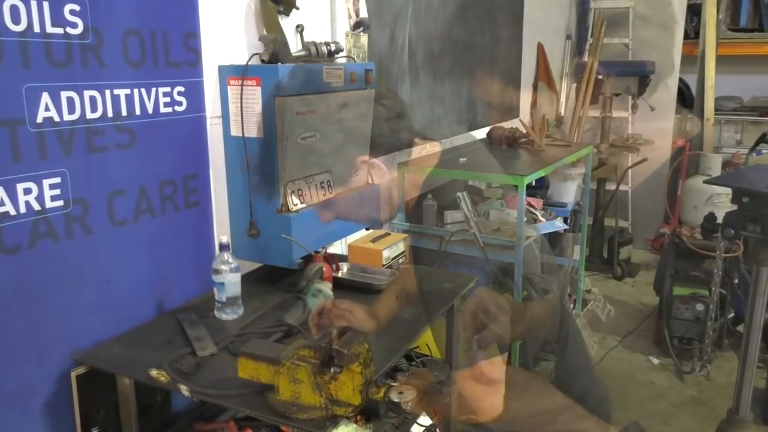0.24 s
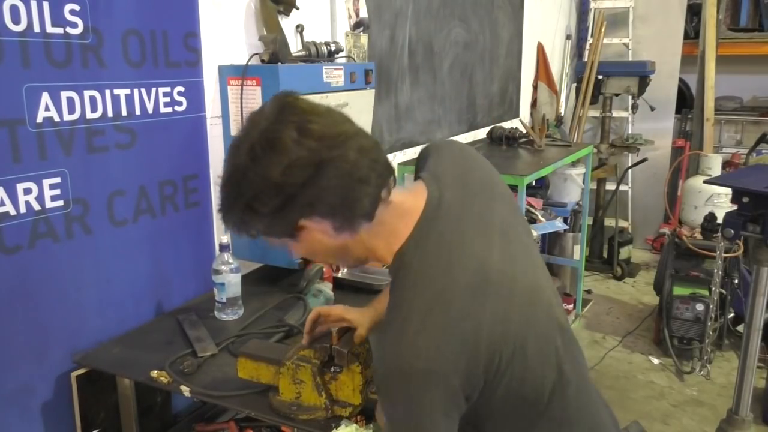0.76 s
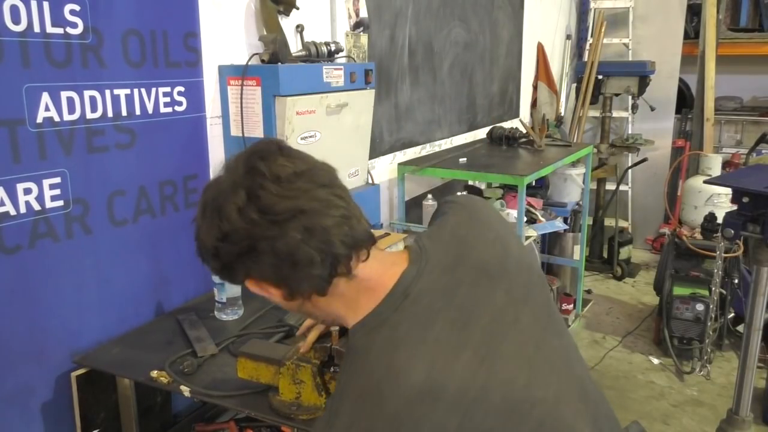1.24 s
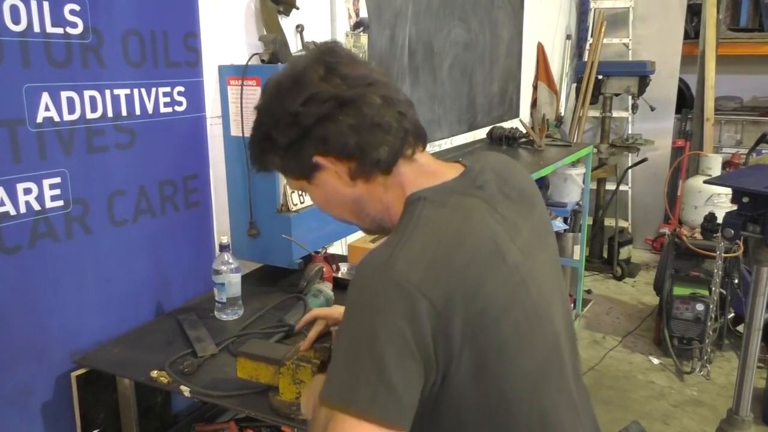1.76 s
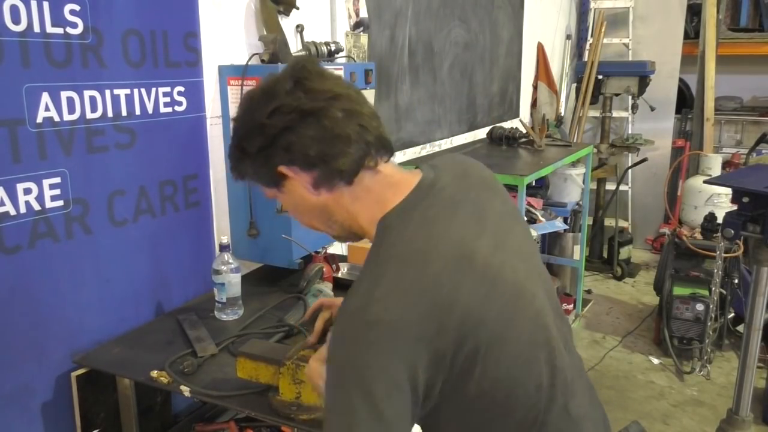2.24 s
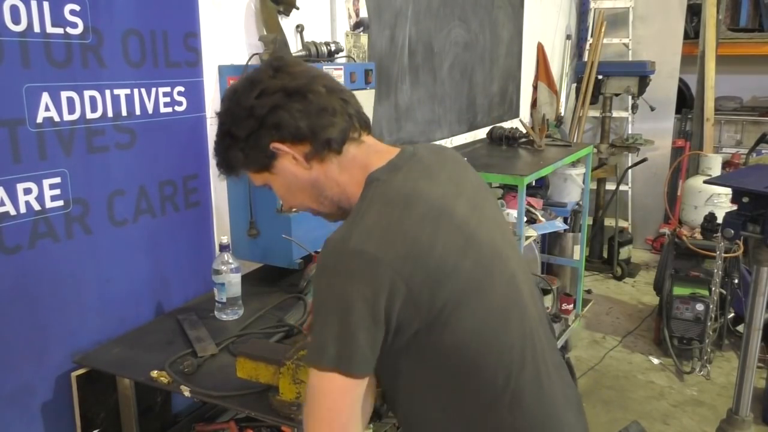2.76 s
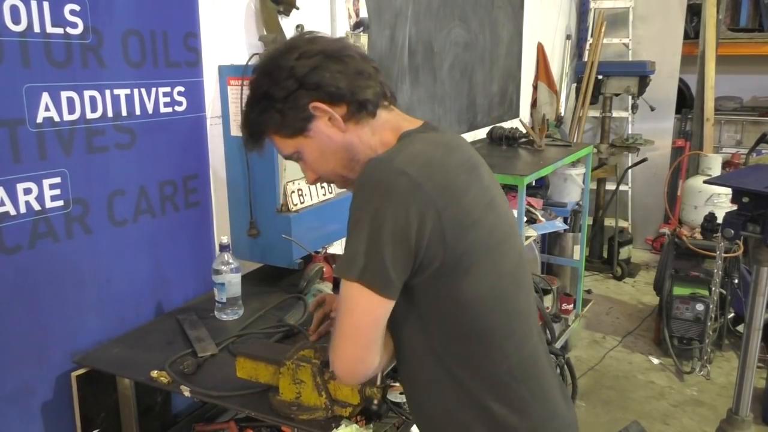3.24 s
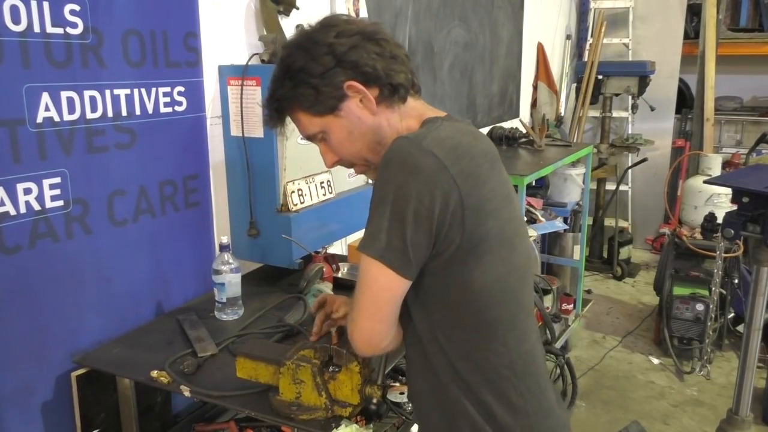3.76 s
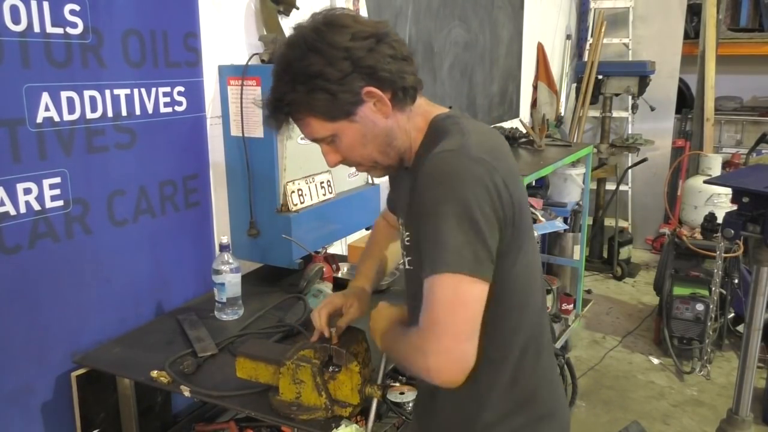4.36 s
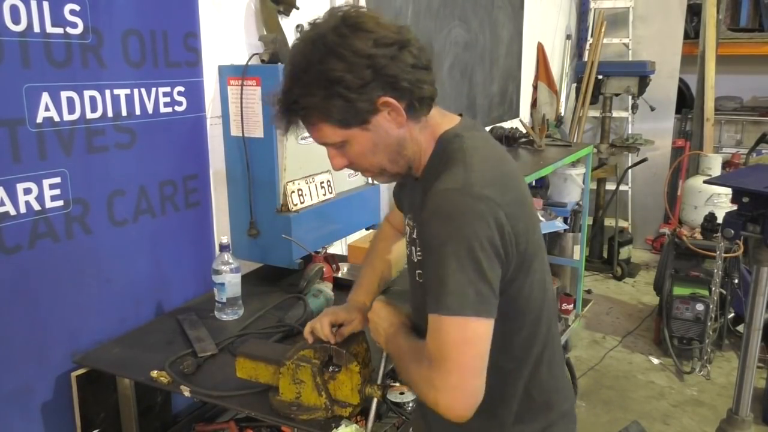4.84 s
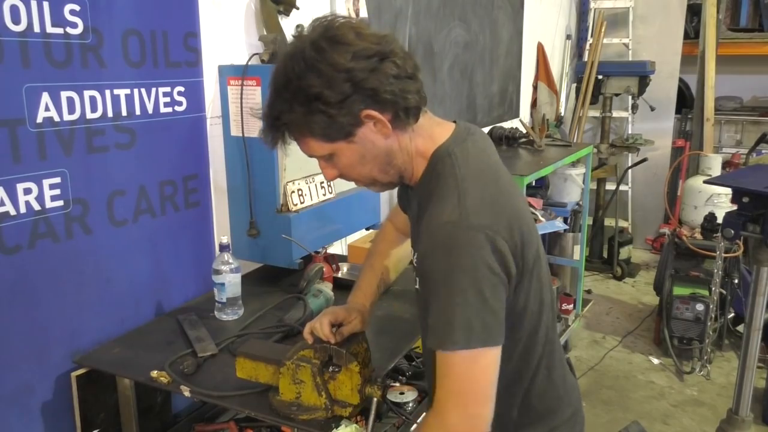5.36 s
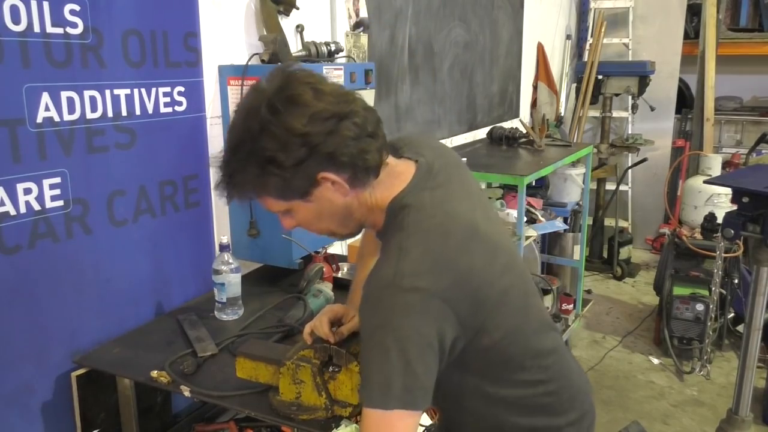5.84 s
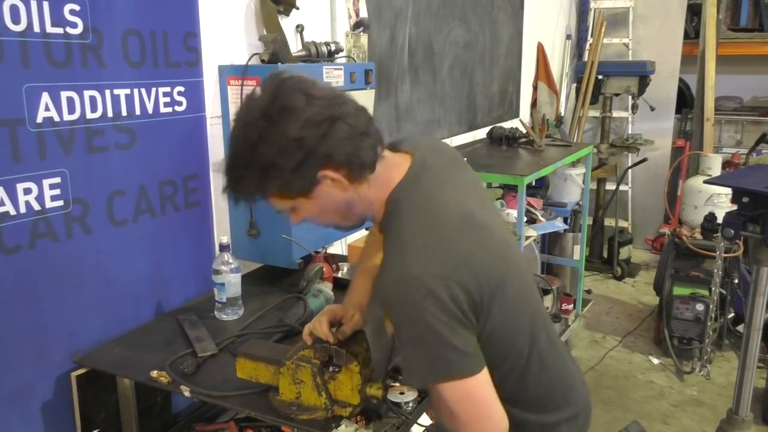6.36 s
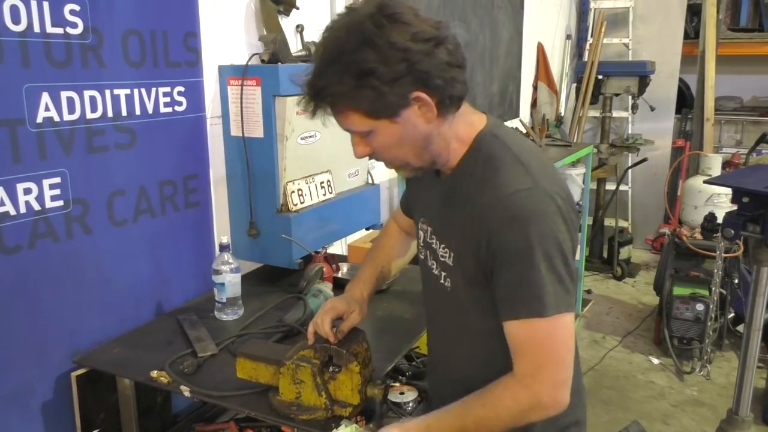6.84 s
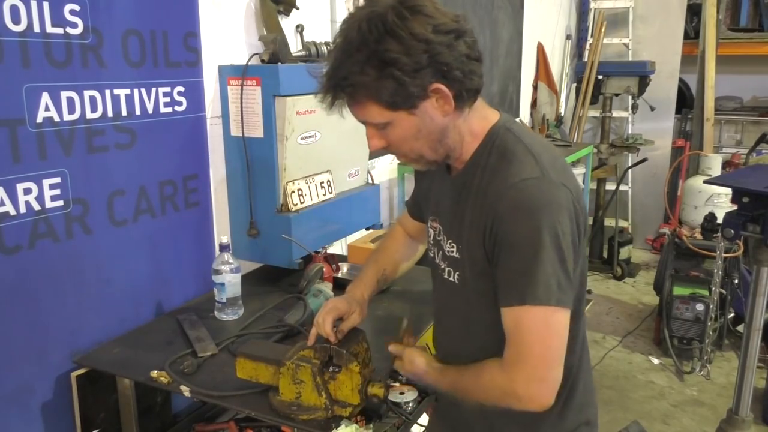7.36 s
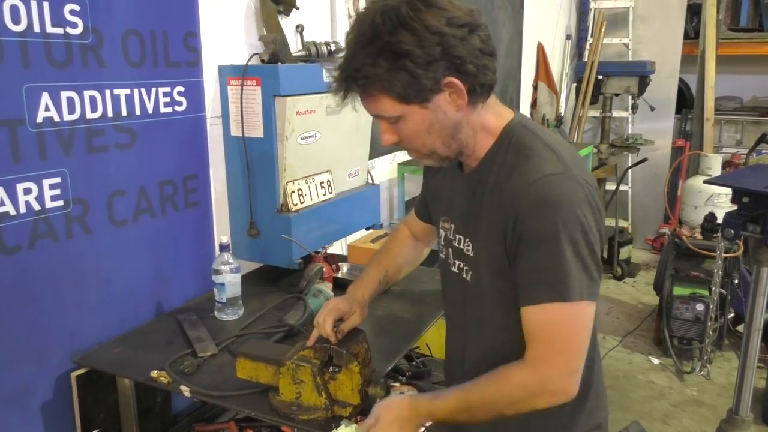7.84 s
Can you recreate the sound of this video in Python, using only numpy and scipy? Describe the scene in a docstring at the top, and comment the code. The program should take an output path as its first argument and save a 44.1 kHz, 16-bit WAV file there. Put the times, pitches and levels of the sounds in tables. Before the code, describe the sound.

A heavy bench vise is worked in a small, echoing workshop. A quick burst of hard clanks comes early with a brief pipe buzz, then mostly quiet handling. Midway the screw grinds and judders with more clanks, the steel handle scrapes through its eye and rings, and dull knocks and loose-handle clunks follow, the sharpest near the end. Fairly close microphone, low rumble underneath.

```python
"""Bench vise tightened on a copper pipe

A vise is wound shut in a small workshop: jaws clank and the screw judders, as random contacts ring the cast body.
The loose steel handle scrapes through its eye, drops and knocks; its bending modes ring.
The bench thuds in low noise and the pinched pipe buzzes in its modes.
Dull, uneven grains swell and fade faintly, some as rough tails behind the clanks.
Filtered noise makes the room's rumble, hum and hiss; a diffuse echo surrounds the vise."""
import sys
import numpy as np
from scipy import signal
from scipy.fft import rfft, irfft
from scipy.io import wavfile
from scipy.ndimage import uniform_filter1d

SR = 44100
rng = np.random.default_rng(int(sys.argv[2]) if len(sys.argv) > 2 else 0)


def store_wav(level_fs):
    """Save 16-bit WAV to argv[1]."""
    pcm = np.round(np.clip(np.atleast_2d(level_fs), -1, 1) * 32767)
    wavfile.write(sys.argv[1], SR, pcm.T.astype(np.int16))


N = 356901
TIME_S = np.arange(N) / SR
FREQ_HZ = np.fft.rfftfreq(8192, 1 / SR)
TOP_HZ = 15600

# workshop rumble, level: time_s, level_db
RUMBLE_LEVEL = [(0.0, -55), (0.11, -53), (0.79, -41.5), (1.13, -43.5), (1.53, -52), (2.05, -56),
                (2.37, -51), (3.54, -52.5), (4.03, -57.5), (4.35, -55.5), (4.5, -51), (5.14, -54),
                (5.38, -51), (6.24, -57), (6.42, -61.5), (8.09, -53.5)]
# workshop rumble, colour: freq_hz, density_db
RUMBLE_COLOUR = [(18, -71.5), (30, -39), (113, -6.5), (200, -1.5), (260, -6), (337, -5.5), (374, -10),
                 (511, -15), (680, -19), (1000, -23), (1170, -26), (1370, -29.5), (1920, -30.5),
                 (3680, -43.5), (15000, -54)]
HUM_HZ = 209
# workshop echo: freq_hz, t60_s
ROOM_T60 = [(150, 0.22), (500, 0.93), (1500, 0.44), (4000, .58), (8000, 0.45), (14000, 0.1)]

# cast body, broad colour: freq_hz, gain_db
BODY_COLOUR = [(35, -60), (110, -24.5), (200, -19.5), (480, -12.5), (720, -16.5), (980, -6.5), (1700, -1),
               (2700, -3), (4000, -4.5), (5100, -11.5), (6600, -21.5), (8200, -24), (10500, -43),
               (15500, -48)]
# cast body, resonances: freq_hz, width_hz, boost_db
BODY_MODES = [(497, 52, 1.8), (947, 14, 9.9), (1070, 48, 6.4), (1427, 74, 9.2), (1600, 110, 2.9),
              (1735, 25, 6.2), (1856, 33, 4), (2244, 95, 6.6), (2476, 55, 6.9), (2650, 26, 10),
              (3454, 140, 7.4), (3820, 10, 2.1), (4060, 46, 1.7), (4650, 120, 3), (6270, 190, 8.3)]
# handle bar, bending modes: freq_hz, level_db, free_t60_s
BAR_MODES = [(1410, 2, 0.18), (3430, 2.5, 0.39), (3860, -18, 0.34), (5164, -5, 0.42), (5235, 4, 0.55),
             (5400, -5.5, .3), (5620, -2.5, 0.19), (6650, -14.5, .3), (8505, 5.5, 0.22), (8550, -1, 0.28),
             (9400, -7, 0.32), (10900, -20.5, .18), (12500, -7, .2)]
# pinched pipe, modes: freq_hz, level_db, t60_s
PIPE_MODES = [(2300, 0.5, .04), (2458, -1.5, .04), (2568, 1, 0.044), (2750, -2.5, .03), (3330, -4, 0.068),
              (3593, -7, .04), (4285, -20.5, .056)]
# bench response to a blow: freq_hz, gain_db
BENCH_COLOUR = [(30, -47.5), (70, -23.5), (120, -12.5), (178, -3.5), (250, -12.5), (480, -13), (750, -22.5),
                (3000, -60)]
# steel rubbing on steel, colour: freq_hz, gain_db
SCRAPE_COLOUR = [(100, -30.5), (250, -18), (500, -19), (720, -18), (980, -6), (1500, 0.5), (1950, 6.5),
                 (3100, -1), (3600, 4), (4200, -1.5), (5250, -3.5), (5750, -18), (7000, -21), (8300, -30),
                 (10000, -41.5), (15000, -67)]

# faint dull grinding and rough tails after clanks: peak_s, level_db, swell_or_fade_s (per 20 dB)
GRINDS = [(0.0, -65, .5), (0.851, -48, 0.51), (1.67, -63, 0.44), (2.3, -70, 1.2), (4.6, -39, 0.25),
          (5.949, -49.5, 0.57), (7.15, -59.5, .5), (8.05, -55.5, 1.17)]
# bench thuds: start_s, level_db
THUDS = [(0.612, -43), (0.661, -35), (0.718, -30.5), (2.222, -34), (4.431, -38), (4.505, -36), (6.203, -35),
         (7.512, -39.5), (7.587, -38)]
THUD_RISE_S, THUD_FALL_S = 0.011, 0.023
# soft handling bumps on the bench: start_s, level_db
BUMPS = [(0.368, -44.5), (0.433, -46.5), (2.802, -59), (2.885, -53), (2.954, -59)]
BUMP_FALL_S, BUMP_THUD_DB = 0.02, 4  # thud re level
# light taps of the handle: start_s, level_db
TAPS = [(0.266, -53.5), (6.762, -53), (6.817, -43.5), (7.180, -66), (7.239, -58.5), (7.312, -53)]
TAP_FALL_S = 0.011
# faint, very high squeaks: start_s, level_db
SQUEAKS = [(0.125, -65), (0.264, -49), (0.363, -65)]
SQUEAK_HZ, SQUEAK_RISE_S, SQUEAK_FALL_S = 12250, 0.0087, 0.0061
# pipe buzzing in the jaws: start_s, level_db, length_s
PIPE_BUZZ = [(0.766, -34, 0.11), (4.52, -44, 0.075)]
# dull knocks as screw play is taken up: start_s, level_db, rise_s, fall_s, clunk_hz, contact_edge_hz
KNOCKS = [ (3.871, -51, 0.0032, .008, 1140, 1420), (6.093, -22.5, 0.011, .007, 1217, 1376),
          (6.203, -28, 0.0043, 0.013, 1480, 1720), (7.516, -27.5, .006, 0.0062, 1396, 2614),
          (7.586, -10, 0.0019, 0.0028, 2270, 2600), (7.588, -7.5, 0.001, 0.0048, 1496, 1910),
          (7.943, -24.5, 0.0016, 0.0065, 1510, 1720), ]
KNOCK_TICK_DB = -22.5  # tick: floor of the contact's treble cut
# loose handle dropping on the eye: start_s, level_db, rise_s, fall_s, bar_ring_db, ring_centre_hz
DROPS = [ (5.422, -17.5, 0.0071, 0.0085, -22.5, 9100), (6.042, -30, .005, 0.009, -43.5, 6500),
         (6.837, -24, 0.017, 0.0091, -21.5, 9000), (6.841, -31, 0.0089, 0.0054, -17, 3000),
         (7.366, -48, 0.0043, 0.0067, -38.5, 6540), (7.450, -26, 0.012, 0.054, -30, 7000),
         (7.496, -24, 0.0066, 0.017, -43, 8000), (7.865, -17.5, 0.011, 0.0021, -18.5, 7000), ]
DROP_CLUNK_HZ, DROP_EDGE_HZ, DROP_TICK_DB = 1390, 3300, -9

# bar sliding through the eye; sing = its lower modes
SLIDE_START_S, SLIDE_FASTEST_S, SLIDE_STOP_S = 5.361, 5.54, 6.055
SLIDE_DB, SLIDE_FIRST_SPEED, SLIDE_SPEED_POWER = -18.5, 0.57, 2.37  # level at full speed; share of it
SLIDE_RING_DB, SLIDE_RING_SAG_DB_PER_S = -5, 59.5  # start level re scrape
SLIDE_HISS_DB, SLIDE_HISS_SAG_DB_PER_S = -16, 121  # start level re scrape
SLIDE_SING_DB = -17.5  # re scrape

# screw binding in the body: start_s, level_db, fall_s, clunk_hz, contact_edge_hz, bar_ring_db
JUDDERS = [ (4.29, -47.5, 0.077, 970, 3020, -55.5), (4.335, -26.5, 0.081, 3450, 3800, -50.5),
           (4.352, -21.5, 0.052, 1760, 1700, -51.5), (4.382, -16.5, 0.023, 990, 1700, -44.5),
           (4.392, -29, 0.046, 4700, 5400, -48), (4.515, -25, .04, 4200, 4630, -61),
           (5.207, -47.5, 0.084, 1510, 3000, -57), (5.234, -24, 0.03, 1810, 3600, -49.5),
           (5.282, -22, 0.011, 1910, 3580, -46), (5.299, -27, 0.018, 5000, 5230, -47.5), ]
JUDDER_RISE_S, JUDDER_RING_HZ = 0.017, 10980
JUDDER_TICK_DB, JUDDER_THUD_DB = -23, -24.5  # treble floor; thud re level
# hard clanks of jaws and screw: start_s, level_db, fall_s, clunk_hz, tick_db (treble floor), bar_ring_db
CLANKS = [ (0.598, -16, 0.0093, 4190, 0.5, -39.5), (0.607, -12.5, 0.0054, 1970, -18, -43),
          (0.614, -15.5, .033, 1030, -16, -54), (0.662, -19.5, 0.0082, 1070, 7, -42.5),
          (0.714, -9.5, 0.0068, 2560, -18, -43), (0.729, -12.5, 0.007, 1030, -26, -71),
          (0.747, -27.5, 0.014, 1400, 19, -45), (2.211, -29.5, 0.0083, 2160, -30, -47),
          (3.173, -43, 0.0074, 2960, -22, -74), (4.429, -14, 0.014, 1732, -22, -44.5),
          (4.493, -9.5, 0.0075, 3110, 7, -37), (4.501, -15, .006, 1050, -35, -51), ]
CLANK_RISE_S, CLANK_EDGE_HZ, CLANK_RING_HZ = 0.0063, 3500, 10500


def undb(db):
    """Decibels to gain."""
    return 10 ** (np.asarray(db) / 20)


def unit(x):
    """Scale to rms 1."""
    return x / np.sqrt(np.mean(x ** 2))


def curve(rows, column=1):
    """One table column, linear in time."""
    rows = np.array(rows)
    return np.interp(TIME_S, rows[:, 0], rows[:, column])


def across(points, hz):
    """A (Hz, value) table, linear in log frequency."""
    table_hz, value = np.transpose(points)
    return np.interp(np.log(np.maximum(hz, 1)), np.log(table_hz), value)


def shape(x, gain_db):
    """Minimum-phase filter with gain_db on FREQ_HZ, from a folded cepstrum."""
    cepstrum = irfft(gain_db * np.log(10) / 20)
    half = len(cepstrum) // 2
    cepstrum[1:half] *= 2
    cepstrum[half + 1:] = 0
    impulse = irfft(np.exp(rfft(cepstrum)))
    return signal.fftconvolve(x, impulse)[:len(x)]


def bump(hz, width_hz):
    """Resonance curve of height 1."""
    return 1 / (1 + (2 * (FREQ_HZ - hz) / width_hz) ** 2)


def fade(t, t60_s):
    """Decay by 60 dB in t60_s."""
    return np.exp(-np.log(1000) * t / t60_s)


def walk(rate_hz):
    """Smooth random curve of rms about 1."""
    hold = max(int(SR / rate_hz), 1)
    steps = np.repeat(rng.standard_normal(N // hold + 1), hold)
    return unit(uniform_filter1d(steps, hold)[:N])


def add(track, start_s, sound):
    """Mix a sound into the track."""
    i = int(start_s * SR)
    track[i:i + len(sound)] += sound[:N - i]


def carry(x, push):
    """Give x the energy of the push that drives it."""
    return x * np.sqrt(np.sum(push ** 2) / np.sum(x ** 2))


def contacts(count, rate_hz):
    """Sparse collisions of rough steel, random in time and size."""
    return rng.standard_normal(count) * (rng.random(count) < rate_hz / SR)


def blow(rise_s, fall_s, swell=0.99):
    """Force of one contact: near-linear rise, exponential fall."""
    t = TIME_S[:SR // 2]
    return np.minimum(t / rise_s, 1) ** swell * np.exp(-np.maximum(t - rise_s, 0) / fall_s)


def rattle(push, hz, t60_s):
    """One mode kept ringing by random contacts whose strength follows push."""
    t = TIME_S[:SR // 12]
    near = signal.butter(1, [.85 * hz, 1.15 * hz], "bandpass", fs=SR, output="sos")
    force = signal.sosfilt(near, push * rng.standard_normal(len(push)))
    impulse = np.sin(2 * np.pi * hz * t) * fade(t, t60_s)
    return carry(signal.fftconvolve(force, impulse)[:len(push)], push)


def sing(push, hz, t60_s, waver=0.0027, waver_rate_hz=150):
    """One mode stores the energy of push and fades; its pitch wavers as the contact shifts."""
    t = TIME_S[:len(push)]
    stored_energy = signal.lfilter([1], [1, -fade(1 / SR, t60_s) ** 2], push ** 2)
    drift = np.interp(t * waver_rate_hz, np.arange(4096), rng.standard_normal(4096))
    cycles = rng.random() + hz * np.cumsum(1 + waver * drift) / SR
    return carry(np.sqrt(stored_energy) * np.sin(2 * np.pi * cycles), push)


def body_modes_db():
    """Resonant boosts of the cast body."""
    return sum(boost_db * bump(hz, width_hz) for hz, width_hz, boost_db in BODY_MODES)


def body_db():
    """Full response of the cast body."""
    return across(BODY_COLOUR, FREQ_HZ) + body_modes_db()


def clank(push, clunk_hz, edge_hz, tick_db, clunk_db=10, clunk_width_hz=420, chatter_rate_hz=7000):
    """Chatter rings the body; a softer contact cuts treble above edge_hz, down to the tick floor."""
    contact_power = 1 / (1 + (FREQ_HZ / edge_hz) ** 8)
    treble_db = 10 * np.log10(contact_power + undb(tick_db) ** 2)
    colour_db = body_db() + clunk_db * bump(clunk_hz, clunk_width_hz) + treble_db
    return carry(shape(push * contacts(len(push), chatter_rate_hz), colour_db), push)


def bar(push, centre_hz, held_t60_s=0.037, free_db=-9, focus_db=14, off_centre_db=16):
    """Handle modes, part damped by the eye and part free; the contact favours those near centre_hz."""
    out = 0
    for hz, level_db, free_t60_s in BAR_MODES:
        # focus_db per squared octave, loss limited to off_centre_db
        loss_db = min(focus_db * np.log2(hz / centre_hz) ** 2, off_centre_db)
        held = rattle(push, hz, held_t60_s)
        free = undb(free_db) * sing(push, hz, free_t60_s)
        out = out + undb(level_db - loss_db) * (held + free)
    return carry(out, push)


def thud():
    """The bench answers a blow with a slow, low swell of noise."""
    sway = blow(THUD_RISE_S, THUD_FALL_S)
    noise = sway * rng.standard_normal(len(sway))
    return carry(shape(noise, across(BENCH_COLOUR, FREQ_HZ)), sway)


def workshop(hum_db=-7, hum_width_hz=12, hiss_db=-82, hiss_width_hz=12000):
    """Low rumble and narrow-band, wavering hum sharing one moving level; thin steady hiss."""
    rumble = unit(shape(rng.standard_normal(N), across(RUMBLE_COLOUR, FREQ_HZ)))
    hum = unit(shape(rng.standard_normal(N), 20 * np.log10(bump(HUM_HZ, hum_width_hz))))
    hiss = unit(shape(rng.standard_normal(N), 20 * np.log10(bump(0, hiss_width_hz))))
    low = (rumble + undb(hum_db) * hum) * undb(curve(RUMBLE_LEVEL))
    return low + undb(hiss_db) * hiss


def room(x, wet_db=-9, first_echo_s=0.0014, build_s=0.0039):
    """Diffuse echo of walls and shelves: noise bands, each with its own decay."""
    t = TIME_S[:SR]
    noise, hz = rfft(rng.standard_normal(SR)), np.arange(SR // 2 + 1)
    edges_hz = np.append(0, np.geomspace(125, SR / 2, 12))
    tail = np.zeros(SR)
    for lo, hi in zip(edges_hz, edges_hz[1:]):
        band = irfft(noise * (hz >= lo) * (hz < hi), SR)
        tail += band * fade(t, across(ROOM_T60, (lo + hi) / 2))
    tail = tail * np.clip((t - first_echo_s) / build_s, 0, 1)
    tail = tail / np.sqrt(np.sum(fade(t, 0.63) ** 2))
    return x + undb(wet_db) * signal.fftconvolve(x, tail)[:N]


def grinding(edge_hz=2400, catch_db=2, catch_rate_hz=22, grain_rate_hz=6000):
    """Dull, uneven grains, coloured by the body, swell and fade; some are rough tails behind clanks."""
    swells = [undb(db - 20 * np.abs(TIME_S - peak_s) / length_s) for peak_s, db, length_s in GRINDS]
    level = np.max(swells, axis=0)
    grains = contacts(N, grain_rate_hz) * undb(catch_db * walk(catch_rate_hz))
    dull_db = -10 * np.log10(1 + (FREQ_HZ / edge_hz) ** 2)
    return unit(shape(grains, body_db() + dull_db)) * level


def bench():
    """Low thuds of the bench under the vise."""
    out = np.zeros(N)
    for start_s, level_db in THUDS:
        add(out, start_s, undb(level_db) * thud())
    return out


def handling(rise_s=0.0035):
    """Hands at work: soft body-and-bench bumps, light body taps, one-mode squeaks."""
    out = np.zeros(N)
    for start_s, level_db in BUMPS:
        body = clank(blow(rise_s, BUMP_FALL_S), clunk_hz=1160, edge_hz=1500, tick_db=-30)
        add(out, start_s, undb(level_db) * (body + undb(BUMP_THUD_DB) * thud()))
    for start_s, level_db in TAPS:
        tap = clank(blow(rise_s, TAP_FALL_S), clunk_hz=1500, edge_hz=3200, tick_db=-11.5)
        add(out, start_s, undb(level_db) * tap)
    for start_s, level_db in SQUEAKS:
        squeak = rattle(blow(SQUEAK_RISE_S, SQUEAK_FALL_S), SQUEAK_HZ, t60_s=0.008)
        add(out, start_s, undb(level_db) * squeak)
    return out


def pipe():
    """Random contacts buzz the pipe's modes under a half-sine push."""
    out, t = np.zeros(N), TIME_S[:SR // 2]
    for start_s, level_db, length_s in PIPE_BUZZ:
        push = np.sin(np.pi * np.minimum(t / length_s, 1))
        buzz = sum(undb(mode_db) * rattle(push, hz, t60_s) for hz, mode_db, t60_s in PIPE_MODES)
        add(out, start_s, undb(level_db) * carry(buzz, push))
    return out


def backlash():
    """Screw play taken up: short, dull body knocks; the gripped handle does not ring."""
    out = np.zeros(N)
    for start_s, level_db, rise_s, fall_s, clunk_hz, edge_hz in KNOCKS:
        knock = clank(blow(rise_s, fall_s), clunk_hz, edge_hz, KNOCK_TICK_DB, clunk_db=13.5)
        add(out, start_s, undb(level_db) * knock)
    return out


def handle():
    """The dropped handle clunks the body and is left free to ring."""
    out = np.zeros(N)
    for start_s, level_db, rise_s, fall_s, ring_db, ring_hz in DROPS:
        push = blow(rise_s, fall_s)
        clunk = undb(level_db) * clank(push, DROP_CLUNK_HZ, DROP_EDGE_HZ, DROP_TICK_DB)
        add(out, start_s, clunk + undb(ring_db) * bar(push, ring_hz))
    return out


def slide(catch_rate_hz=70, catch_db=0.9, grain_rate_hz=8000, ring_hz=9000, sing_hz=3600,
          hiss_hz=8500, hiss_width_hz=7000):
    """The bar scrapes and sings louder with speed; top ring and hiss sag relative to the scrape."""
    out, t = np.zeros(N), TIME_S[:SR]
    times_s = [SLIDE_START_S, SLIDE_FASTEST_S, SLIDE_STOP_S]
    speed = np.interp(SLIDE_START_S + t, times_s, [SLIDE_FIRST_SPEED, 1, 0])
    catch = catch_db * walk(catch_rate_hz)[:len(t)]
    friction = speed ** SLIDE_SPEED_POWER * undb(SLIDE_DB + catch)

    scrape_db = across(SCRAPE_COLOUR, FREQ_HZ) + body_modes_db()
    scrape = unit(shape(contacts(len(t), grain_rate_hz), scrape_db))
    hiss_colour_db = 20 * np.log10(bump(hiss_hz, hiss_width_hz))
    hiss = unit(shape(contacts(len(t), grain_rate_hz), hiss_colour_db))
    hiss = hiss * undb(SLIDE_HISS_DB - SLIDE_HISS_SAG_DB_PER_S * t)

    ring = bar(friction * undb(SLIDE_RING_DB - SLIDE_RING_SAG_DB_PER_S * t), ring_hz)
    song = undb(SLIDE_SING_DB) * bar(friction, sing_hz, off_centre_db=32)
    add(out, SLIDE_START_S, (scrape + hiss) * friction + ring + song)
    return out


def judders():
    """The screw binds: slower swells of body chatter, bench shaking in proportion, bar ringing."""
    out = np.zeros(N)
    for start_s, level_db, fall_s, clunk_hz, edge_hz, ring_db in JUDDERS:
        push = blow(JUDDER_RISE_S, fall_s)
        body = clank(push, clunk_hz, edge_hz, JUDDER_TICK_DB, clunk_db=13, clunk_width_hz=300)
        body = body + undb(JUDDER_THUD_DB) * thud()
        add(out, start_s, undb(level_db) * body + undb(ring_db) * bar(push, JUDDER_RING_HZ))
    return out


def jaws():
    """Hard clanks of the body that also shake the handle."""
    out = np.zeros(N)
    for start_s, level_db, fall_s, clunk_hz, tick_db, ring_db in CLANKS:
        push = blow(CLANK_RISE_S, fall_s)
        body = undb(level_db) * clank(push, clunk_hz, CLANK_EDGE_HZ, tick_db)
        add(out, start_s, body + undb(ring_db) * bar(push, CLANK_RING_HZ))
    return out


def scene():
    """The vise in its room."""
    vise = grinding() + bench() + handling() + pipe() + backlash() + handle() + slide() + judders() + jaws()
    return (room(vise) + workshop())[None]


def record(dry, low_cut_hz=46):
    """The microphone gently rounds peaks and thins the deepest bass; the top is cut."""
    rounded = np.tanh(dry)
    bass_cut = signal.butter(2, low_cut_hz, "highpass", fs=SR, output="sos")
    top_cut = signal.ellip(10, .2, 70, TOP_HZ, fs=SR, output="sos")
    return signal.sosfilt(top_cut, signal.sosfilt(bass_cut, rounded))


dry = scene()
out = record(dry)
store_wav(out)
```